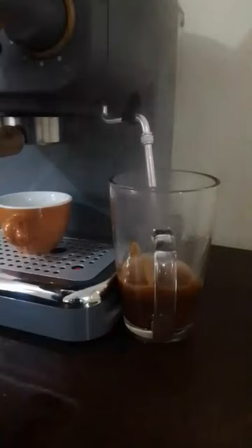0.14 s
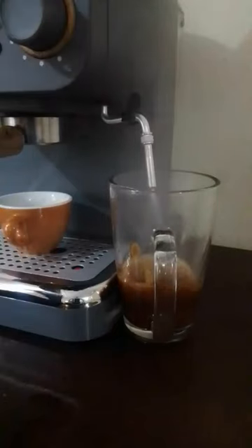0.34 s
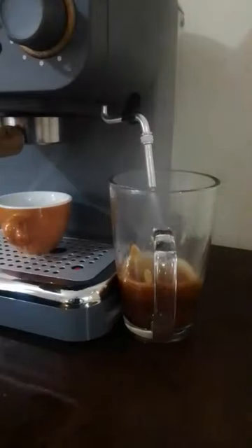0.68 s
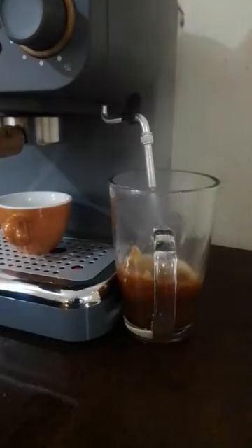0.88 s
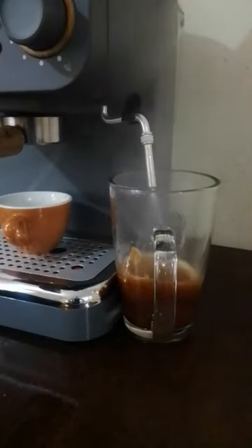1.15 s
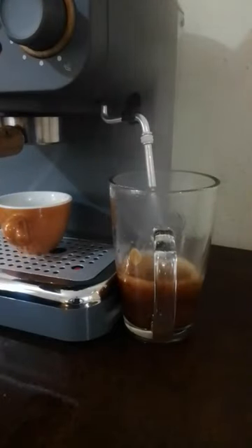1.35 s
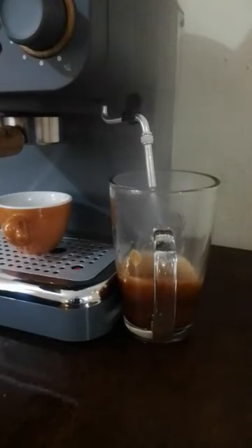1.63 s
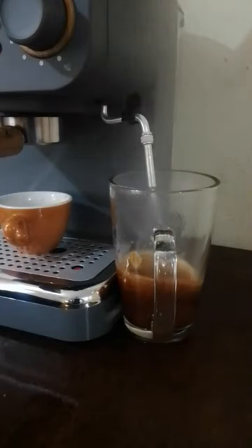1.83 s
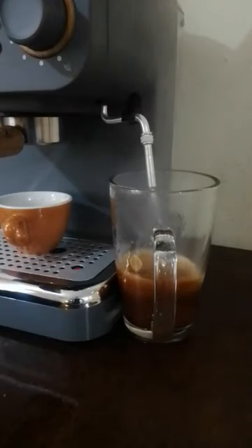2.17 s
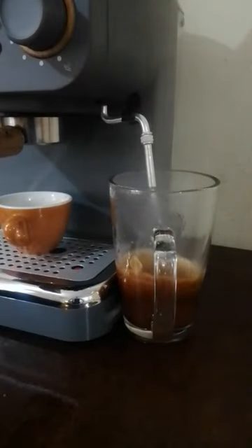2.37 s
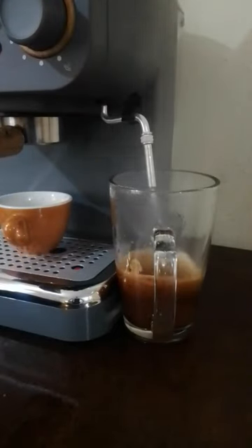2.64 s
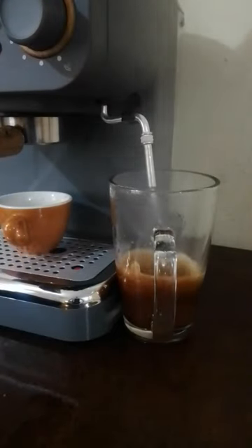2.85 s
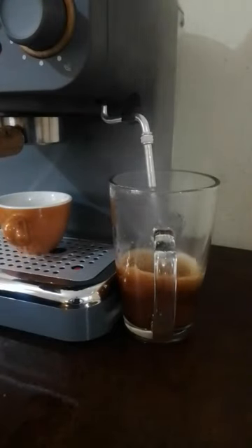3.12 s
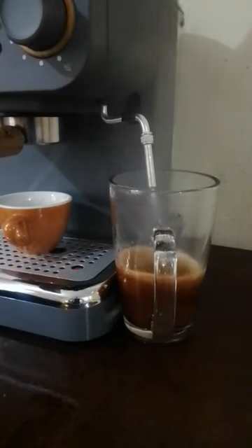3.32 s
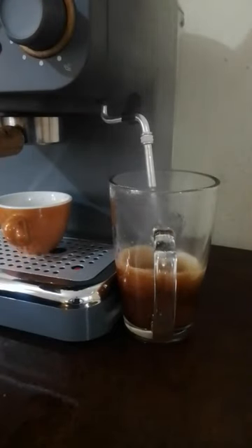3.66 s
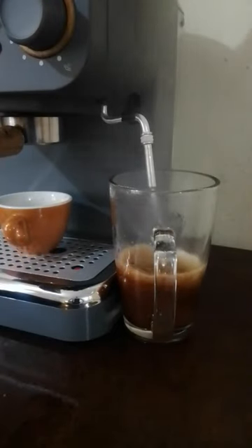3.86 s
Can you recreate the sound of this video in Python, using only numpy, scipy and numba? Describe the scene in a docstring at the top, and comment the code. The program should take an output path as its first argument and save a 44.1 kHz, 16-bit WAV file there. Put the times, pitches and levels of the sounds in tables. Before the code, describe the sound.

Steam and hot water sputter from an espresso machine wand into a half-filled glass mug

```python
"""After a short silence the sound opens abruptly; its background is louder and duller at the start, then falls
to a steady level. Hot water and steam sputter from the wand of an espresso machine into a glass mug that
slowly fills: turbulent noise excites the resonances of the air in it, whose pitch climbs unevenly.
The nozzle hisses in bright resonances, droplets burst as short pings, and slugs of water slap the surface.
Broad splash and room noise, a faint pump hum at fixed tones and the kitchen's reverberation lie underneath."""
import sys
import numpy as np
from scipy import signal
from scipy.fft import rfft, irfft, next_fast_len
from scipy.io import wavfile
from numba import njit

SR = 44100
rng = np.random.default_rng(int(sys.argv[2]) if len(sys.argv) > 2 else 0)


def master(y):
    """Save y as 16-bit WAV."""
    cut = np.clip(np.atleast_2d(y).T, -1, 1)
    pcm = np.round(cut * 32767)  # scale
    wavfile.write(sys.argv[1], SR, pcm.astype(np.int16))


N = 176400
TIME_S = np.arange(N) / SR
OPEN_S = 0.286  # the microphone opens
SINCE_OPEN_S = np.maximum(TIME_S - OPEN_S, 0)
SPUTTER_HZ, SLOSH_HZ = 90, 7.6  # rates of the level fluctuations


def from_db(db):
    """Level in dB to amplitude ratio, by the logarithmic law."""
    return 10 ** (np.asarray(db) / 20)


def rms_one(x):
    """Normalise the mean-square amplitude to 1."""
    return x / np.sqrt(np.mean(x ** 2) + 1e-20)


def curves(table):
    """Linear interpolation of each column after the first, which is time."""
    s, *columns = np.transpose(table)
    return [np.interp(TIME_S, s, column) for column in columns]


def drift(rate_hz):
    """Random fluctuation of rms 1: white noise through a two-pole low-pass at the given rate."""
    # Computed at one eighth of the sample rate; the first 4000 values let the filter settle.
    r = np.exp(-16 * np.pi * rate_hz / SR)
    noise = rng.standard_normal(N // 8 + 4002)
    slow = signal.lfilter([1], [1, -2 * r, r * r], noise)[4000:]
    return np.interp(np.arange(N) / 8, np.arange(len(slow)), rms_one(slow))


@njit
def resonate(x, hz, r, sr):
    """Damped resonator: a pole pair at a movable centre, with gain close to 1 at the peak."""
    y = np.zeros(len(x))
    for i in range(2, len(x)):
        drive = (1 - r * r) / 2 * (x[i] - x[i - 2])
        y[i] = drive + 2 * r * np.cos(2 * np.pi * hz[i] / sr) * y[i - 1] - r * r * y[i - 2]
    return y


def band(x, hz, width_hz):
    """Cascaded resonance: two equal resonators give steep flanks; the centre may glide."""
    hz = hz + np.zeros(len(x))
    r = np.exp(-np.pi * width_hz / SR)
    once = resonate(x + 1e-18, hz, r, SR)
    return resonate(once, hz, r, SR)


def jet(sputter_db, shared):
    """Turbulence: white noise modulated in level, partly in step with the whole jet."""
    own = 0.71 * drift(SPUTTER_HZ)
    return rng.standard_normal(N) * from_db(sputter_db * (shared + own))


# Pump hum, tones at multiples of the stroke: (f/Hz, rms level/dB)
PUMP_TONES = [(100, -81.5), (400, -67.5), (900, -55)]
PUMP_WAVER_DB = 2


def pump():
    """Periodic excitation: tones at multiples of the pump's stroke, each wavering in level."""
    out = np.zeros(N)
    for hz, db in PUMP_TONES:
        amplitude = np.sqrt(2) * from_db(db + PUMP_WAVER_DB * drift(1.6))
        out += amplitude * np.sin(2 * np.pi * (hz * TIME_S + rng.random()))
    return out


KITCHEN_T60_S, KITCHEN_DB = 0.46, -8  # decay time; level relative to the direct sound


def kitchen(x):
    """Reverberation: ten feedback delays of unrelated lengths share one exponential decay."""
    size = next_fast_len(N + SR)  # room for the tails
    w = np.linspace(0, np.pi, size // 2 + 1)
    lags = rng.uniform(0.008, 0.03, 10) * SR
    echoes = 0
    for k, lag in enumerate(lags):
        loss = from_db(60 * lag / SR / KITCHEN_T60_S)
        echoes = echoes + (-1) ** k / (np.exp(1j * w * lag) * loss - 1)
    wet = irfft(rfft(x, size) * echoes, size)[:N]
    return from_db(KITCHEN_DB) * x.std() * rms_one(wet)


# Spectral density of the broad splash and room noise: (f/Hz, relative level per Hz/dB)
BACKGROUND_SPECTRUM = [(30, -30), (90, -23.5), (150, -28.5), (210, -14), (300, -2.5), (420, -6.5),
                       (600, -7), (1100, -5), (1500, -23), (1900, -25.5), (2600, -12.5), (4400, -12.5),
                       (5400, -15.5), (6500, -21.5), (8500, -22), (11600, -17), (16000, -24.5)]
STEADY_DB, STEADY_START_DB = -50.5, -1.5  # steady level; its change at the start
# The background is louder and duller at the start, then falls to the steady level.
EARLY_DB, EARLY_FALL_S, EARLY_CORNER_HZ = -42.5, 0.15, 4700


def background(shared):
    """Broadband noise by spectral shaping: louder and duller at the start, then at a steady level."""
    hz = np.maximum(np.arange(N // 2 + 1) * SR / N, 1)
    f, db = np.transpose(BACKGROUND_SPECTRUM)
    colour = from_db(np.interp(np.log(hz), np.log(f), db))
    steady = irfft(rfft(jet(1.0, shared)) * colour, N)
    dull_colour = colour / (1 + (hz / EARLY_CORNER_HZ) ** 4) / (1 + (220 / hz) ** 4)
    dull = irfft(rfft(rng.standard_normal(N)) * dull_colour, N)
    early = np.exp(-(SINCE_OPEN_S / EARLY_FALL_S) ** 2)
    steady_gain = from_db(STEADY_DB + STEADY_START_DB * early)
    return steady_gain * rms_one(steady) + from_db(EARLY_DB) * early * rms_one(dull)


FLARE_HZ, FLARE_WIDTH_HZ, FLARE_WANDER_HZ = 4790, 250, 40
FLARE_START_DB, FLARE_END_DB, FLARE_DEPTH_DB = -54, -62.5, 3


def flare(shared):
    """Resonance: a weaker, higher mode of the mug flares in broken patches and wanders a little."""
    drive = jet(2.4, 0.49 * shared) * from_db(FLARE_DEPTH_DB * drift(38.0))
    centre_hz = FLARE_HZ + FLARE_WANDER_HZ * drift(6.5)
    level = from_db(np.linspace(FLARE_START_DB, FLARE_END_DB, N))
    return level * rms_one(band(drive, centre_hz, FLARE_WIDTH_HZ))


# Droplets at set times, most of them loud: (t/s, level of the ping/dB, f/Hz)
TIMED_DROPLETS = [(0.3175, -35, 9550), (0.5772, -37.5, 9620), (0.6256, -36, 9620), (0.728, -41, 9840),
                  (0.7847, -41, 9700), (0.8685, -47, 9600), (1.1444, -39, 9900), (1.304, -39.5, 10700),
                  (1.4038, -41, 9600), (1.7899, -40, 9800), (1.8657, -36, 10300), (1.9491, -41, 11000),
                  (2.0518, -38, 10100), (2.1356, -38, 10300), (2.1581, -37.5, 10900), (2.2224, -35, 10150),
                  (2.3511, -35, 10040), (2.3906, -41, 9950), (2.434, -41, 9900), (2.5198, -39, 9900),
                  (2.5502, -40, 10000), (2.6001, -40.5, 10700), (2.636, -39, 9800), (2.6784, -41, 9880),
                  (2.7622, -40, 10400), (3.0293, -39.5, 10700), (3.1379, -43, 10700), (3.4686, -44, 9700),
                  (3.5729, -40, 9740), (3.6372, -43, 9600), (3.7375, -37, 10700), (3.853, -39.5, 10000)]
# Modes rung by every droplet: (f/Hz, relative level/dB)
DROPLET_MODES = [(9600, -4.5), (9950, -3.5), (10800, -5), (12250, -8), (15500, 0)]
SPITS_PER_S, SPIT_DB, SPIT_SPREAD_DB = 170, -50, 2.6  # droplets at random times
MODE_SPREAD_DB, MODE_WANDER_HZ = 4, 70  # how droplets differ in their modes
SPIT_RISE_S, SPIT_FALL_S = 0.001, 0.0025


def spits():
    """Impulsive excitation: each droplet rings several decaying modes; a timed one adds its own ping."""
    count = int(SPITS_PER_S * N / SR)
    times_s = rng.random(count) * N / SR
    levels_db = SPIT_DB + SPIT_SPREAD_DB * rng.standard_normal(count)
    small = np.transpose([times_s, levels_db, np.zeros(count)])  # 0 Hz: no ping
    t = np.arange(700) / SR
    shape = (1 - np.exp(-(t / SPIT_RISE_S) ** 2)) * np.exp(-t / SPIT_FALL_S)
    shape = shape / shape.max()
    modes_hz, modes_db = np.transpose(DROPLET_MODES)
    out = np.zeros(N + len(t))
    for s, db, hz in np.vstack([TIMED_DROPLETS, small]):
        level_chance, pitch_chance = rng.standard_normal((2, len(modes_hz)))
        gains = from_db(modes_db + MODE_SPREAD_DB * level_chance)
        rings = gains @ np.sin(2 * np.pi * np.outer(modes_hz + MODE_WANDER_HZ * pitch_chance, t))
        ping = np.sin(2 * np.pi * hz * t)
        start = int(s * SR)
        out[start:start + len(t)] += from_db(db) * shape * (ping + rings / (3 if hz else 1))
    return out[:N]


# Hiss resonances of the nozzle: (f/Hz, width/Hz, relative level/dB, added level at first/dB)
NOZZLE_MODES = [(6000, 370, -20.5, 0), (7030, 380, -16, 5), (7830, 590, -16, -4), (9040, 260, -13.5, 1),
                (9800, 390, -11, 9), (10700, 270, -12.5, -8), (12500, 700, -11, -4), (13050, 700, -13, -3),
                (13550, 500, -11, -2), (13950, 400, -7, 0), (14350, 430, 1.5, -7), (14790, 300, -0.5, 7),
                (15350, 400, -3.5, -8), (15660, 470, 1.5, -2)]
NOZZLE_SETTLE_S, NOZZLE_SWELL_DB, NOZZLE_SHARED = 0.69, 1.5, 0.51  # last: share of the common sputter


def nozzle(level_db, shared):
    """Resonant filtering of turbulence: three noises drive bright modes, each swelling on its own."""
    drives = [jet(3.4, NOZZLE_SHARED * shared) for _ in range(3)]
    early = np.exp(-SINCE_OPEN_S / NOZZLE_SETTLE_S)
    out = np.zeros(N)
    for k, (hz, width_hz, db, first_db) in enumerate(NOZZLE_MODES):
        gain = from_db(db + first_db * early + NOZZLE_SWELL_DB * drift(1.7))
        out += gain * band(drives[k % 3], hz, width_hz)
    return from_db(level_db) * rms_one(out)


# Crosswise modes of the air in the mug: (frequency ratio to the centre, width/Hz, relative level/dB)
CROSS_MODES = [(0.917, 170, -0.5), (.965, 141, 1.5), (1.015, 153, 1.5), (1.06, 151, -0.5), (.8, 79, -19)]
# Upper band, rocked by the sloshing surface: (t/s, centre f/Hz, relative level of its top edge/dB)
CROSS_PITCH = [(.3, 3400, -0.5), (.55, 3333, -5), (1.0, 3365, -3.5), (2.1, 3362, -5), (2.45, 3430, 0),
               (3.2, 3440, -1.5), (3.6, 3410, -3.5), (4.0, 3470, -2)]
TOP_EDGE_RATIO, TOP_EDGE_WIDTH_HZ = 1.1115, 182
SWELL_DB, SWELL_HZ = 1.7, 3.8  # each crosswise mode swells on its own


def mug_high(x, swell_db=0):
    """Transverse cavity modes of alternating sign, below a top one that comes and goes."""
    centre, top_db = [curve[:len(x)] for curve in curves(CROSS_PITCH)]
    out = from_db(top_db) * band(x, TOP_EDGE_RATIO * centre, TOP_EDGE_WIDTH_HZ)
    for k, (ratio, width_hz, db) in enumerate(CROSS_MODES):
        gain = from_db(db + swell_db * drift(SWELL_HZ)[:len(x)])
        out += (-1) ** k * gain * band(x, ratio * centre, width_hz)
    return out


def ring_mug(x):
    """Soft impact: a slap first excites the middle of the upper band, then the mug's modes."""
    return mug_high(band(x, 3400, 730))


# Slaps at set times, most of them strong: (t/s, peak level/dB)
TIMED_SLAPS = [(0.4062, -36), (0.445, -40), (0.8072, -23), (0.8506, -22), (0.9031, -20), (0.9591, -22),
               (0.9854, -19), (1.078, -24.5), (1.1875, -28), (1.3072, -18.5), (1.371, -24), (1.4394, -25),
               (1.4783, -25), (1.573, -20.5), (1.6664, -18), (1.6932, -20.5), (1.7252, -27), (1.7428, -22),
               (1.7756, -21), (1.8512, -22), (1.933, -16), (1.9951, -24), (2.0619, -23), (2.3019, -41),
               (2.4352, -23), (2.6015, -22.5), (2.6338, -22), (2.7844, -25), (2.9124, -35), (3.002, -24),
               (3.0977, -24), (3.2762, -32), (3.5725, -23), (3.6801, -26)]
SLAPS_PER_S, SLAP_DB, SLAP_SPREAD_DB = 60, -31.5, 2.5  # slaps at random times


def slaps():
    """Impulse response: slugs of water slap the surface and ring the mug's upper band."""
    struck = rng.random(N) < SLAPS_PER_S / SR
    levels = from_db(SLAP_DB + SLAP_SPREAD_DB * rng.standard_normal(N))
    clicks = struck * levels * rng.choice([-1, 1], N)
    for s, peak_db in TIMED_SLAPS:
        clicks[int(s * SR)] = from_db(peak_db)
    unit_click = np.arange(N // 20) == 2
    return ring_mug(clicks) / np.abs(ring_mug(unit_click)).max()


# Lengthwise modes: (frequency ratio to the centre, width/Hz, relative start level/dB, end level/dB)
COLUMN_MODES = [(.8, 124, -3, -17), (.92, 82, 5, -7), (1.01, 58.5, -3, 2), (1.1, 70, 3, -2.5),
                (1.24, 80, -1.5, -27.5), (1.45, 246, -24.5, -22.5)]
# Centre of the low roar: (t/s, f/Hz)
COLUMN_PITCH = [(0.29, 812), (1.19, 869), (1.48, 862), (1.5, 867), (1.74, 828), (1.79, 875), (2.13, 865),
                (2.22, 910), (2.54, 857), (2.6, 926), (2.85, 824), (3.08, 914), (3.24, 854), (3.44, 892),
                (3.81, 838), (4.0, 926)]
NARROWED_S = 2.73  # by then the lower part has faded


def mug_low(level_db, drive):
    """Air-column resonance: the jet sounds lengthwise modes, whose lower part fades as the mug fills."""
    centre, = curves(COLUMN_PITCH)
    filled = np.clip(TIME_S / NARROWED_S, 0, 1)
    out = np.zeros(N)
    for k, (ratio, width_hz, start_db, end_db) in enumerate(COLUMN_MODES):
        gain = from_db(start_db + (end_db - start_db) * filled)
        out += (-1) ** k * gain * band(drive, ratio * centre, width_hz)
    return from_db(level_db) * rms_one(out)


# Flow: (t/s, low roar level/dB, upper band level/dB, nozzle hiss level/dB)
FLOW_LEVELS = [(0.29, -48.5, -39, -45), (0.39, -44.5, -40, -54), (0.41, -44.5, -33.5, -47),
               (0.46, -38.5, -33.5, -46.5), (0.6, -41.5, -37.5, -45.5), (0.69, -37, -35.5, -47),
               (0.71, -44, -38.5, -49), (0.84, -40.5, -35.5, -47.5), (1.1, -37, -36, -46.5),
               (1.2, -40, -32.5, -44), (1.28, -50, -36, -47), (1.32, -41, -34, -46),
               (1.39, -48, -34, -45.5), (1.45, -42.5, -35.5, -46), (1.72, -39, -36.5, -45.5),
               (2.72, -40, -37.5, -45.5), (2.82, -40, -35, -45.5), (3.36, -40, -36, -46.5),
               (3.45, -37, -36, -46), (3.53, -43.5, -41, -48), (3.65, -38.5, -37.5, -46),
               (3.968, -40, -36.5, -49.5), (4.0, -80, -47, -54)]


def scene():
    """Superposition: all sources add at one microphone, with the room's reply."""
    low_db, high_db, hiss_db = curves(FLOW_LEVELS)
    shared = 1.04 * drift(SPUTTER_HZ) + 0.48 * drift(SLOSH_HZ)
    out = background(shared) + flare(shared) + spits() + nozzle(hiss_db, shared) + slaps()
    out += from_db(high_db) * rms_one(mug_high(jet(1.4, shared), SWELL_DB))
    out += mug_low(low_db, jet(2.2, shared))
    return (out + kitchen(out) + pump())[None]


CUTOFF_HZ, OPENING_S = 15700, 0.0012


def record(dry):
    """Gating and low-pass filtering: the microphone opens in about a millisecond; the top is cut."""
    gate = np.clip((TIME_S - OPEN_S) / OPENING_S, 0, 1)
    top_cut = signal.ellip(12, 0.5, 75, CUTOFF_HZ, fs=SR, output="sos")
    return signal.sosfilt(top_cut, dry * gate)


dry = scene()
out = record(dry)
master(out)
```